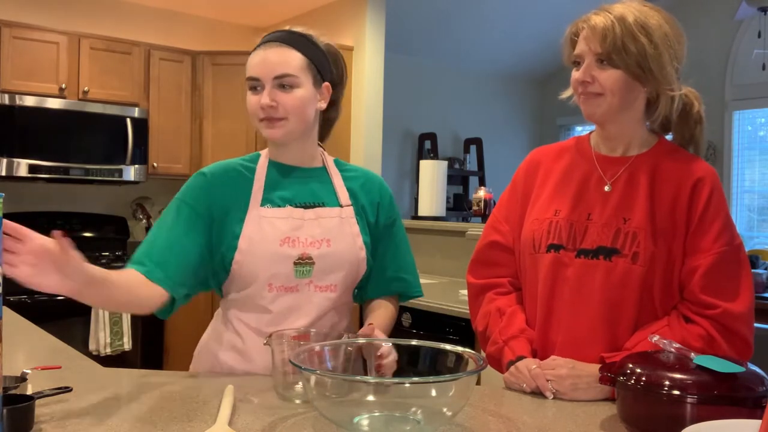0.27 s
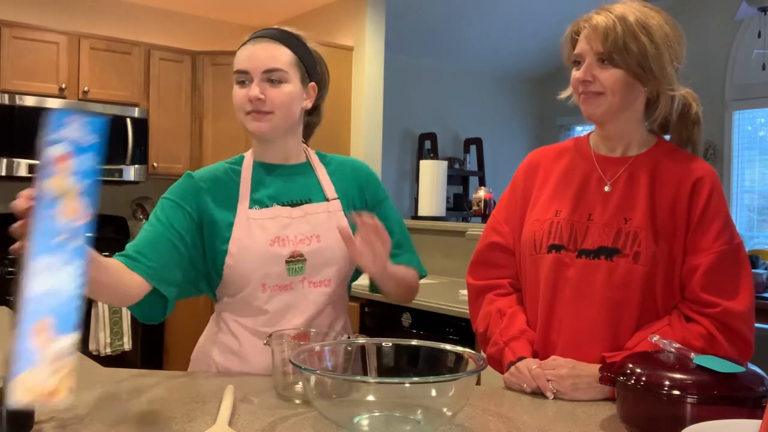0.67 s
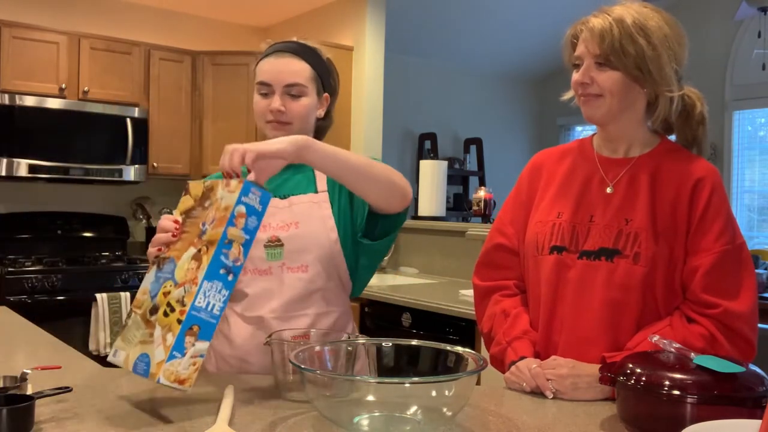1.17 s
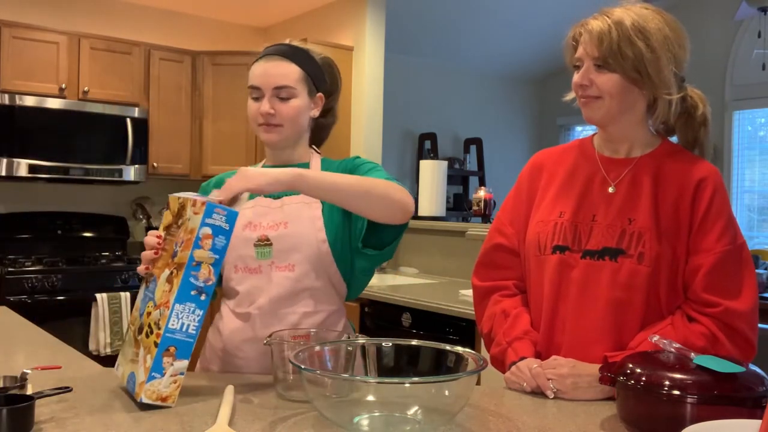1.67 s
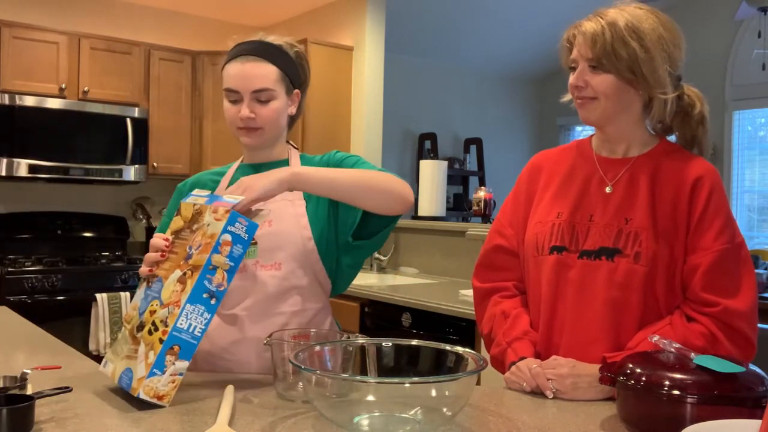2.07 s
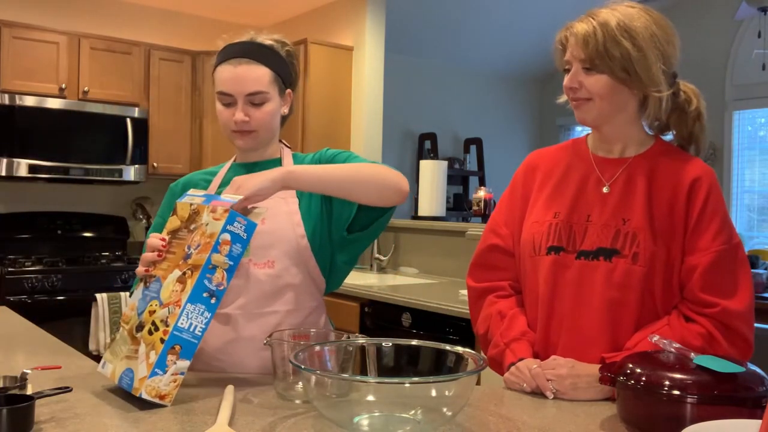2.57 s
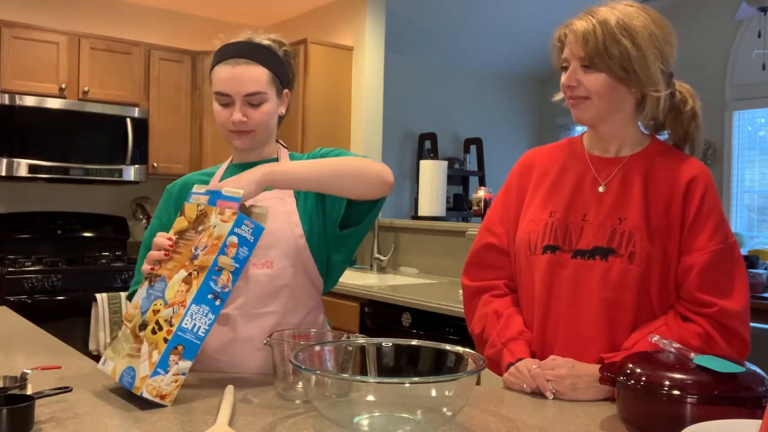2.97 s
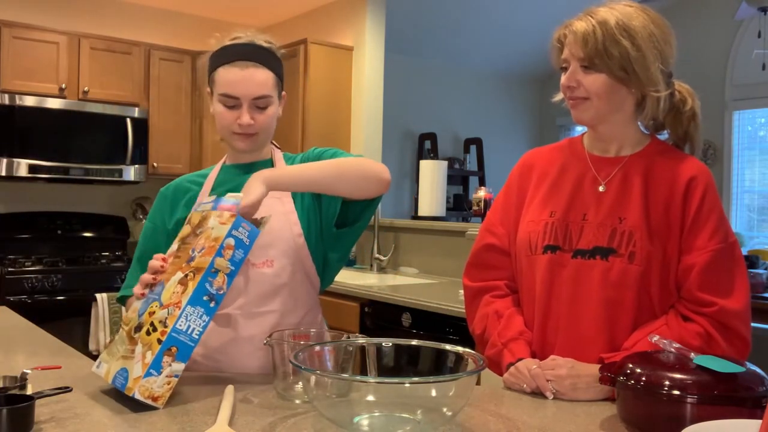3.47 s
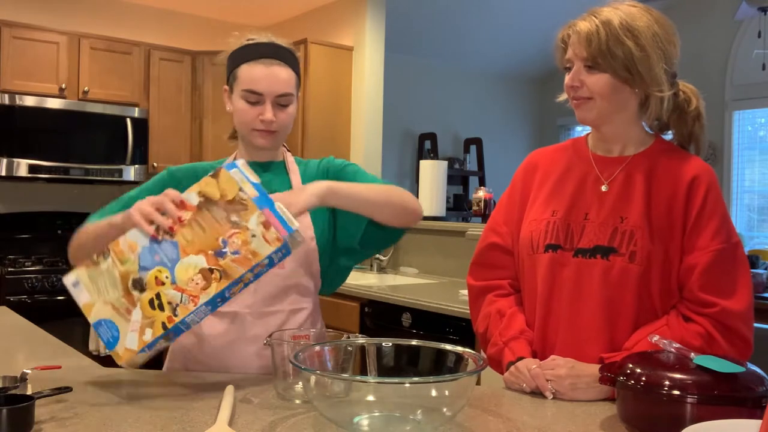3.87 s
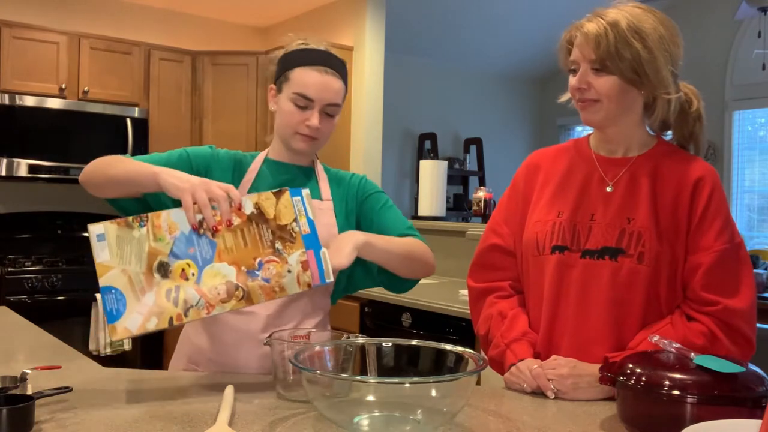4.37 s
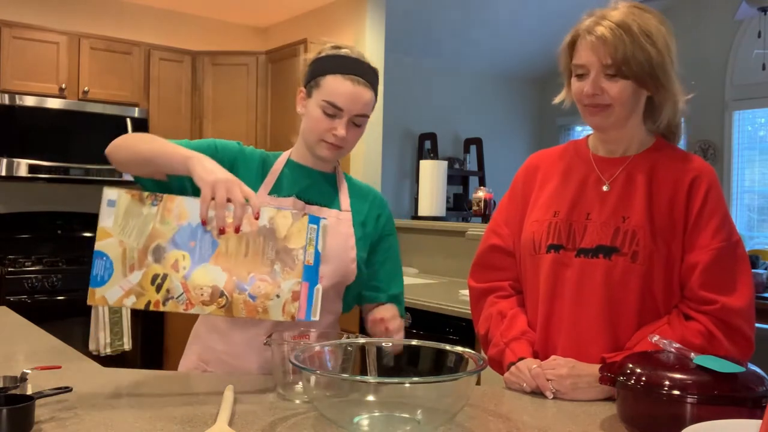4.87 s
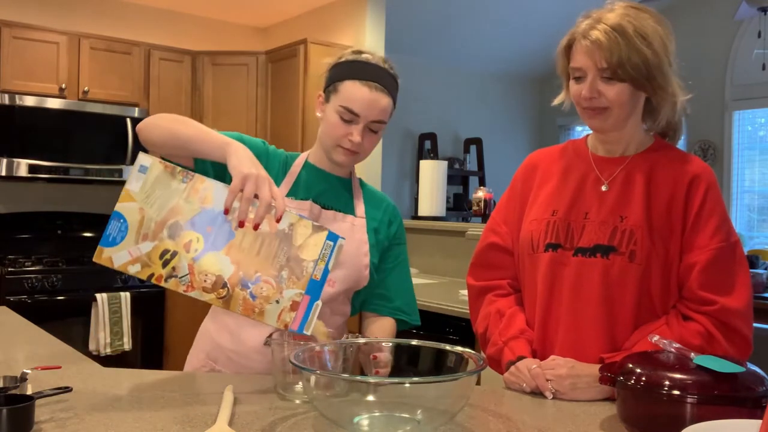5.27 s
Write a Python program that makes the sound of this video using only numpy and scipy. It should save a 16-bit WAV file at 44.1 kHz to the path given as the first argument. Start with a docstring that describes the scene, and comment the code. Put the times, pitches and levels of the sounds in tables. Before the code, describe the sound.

In a kitchen, a hand scrapes and taps a cardboard cereal box, then sets it down with a hollow knock. The inner bag crackles and rustles sharply as it is worked open, with pieces clicking inside. After a brief lull, cereal slides out and starts to patter brightly into glass. A low engine drone and soft room hum lie underneath; close stereo from a metre or two.

```python
"""Cereal box in a kitchen

A hand fetches a cardboard cereal box, knocks it on the counter, crumples the inner bag open and tips
the cereal into a glass cup. Rustle, cracks and drops are grains and noise bursts shaped by filters;
blows ring box modes, pieces ring cup modes. Outside an engine of a few orders drones past over room hum
and air. It is heard in stereo from a metre or two away.
"""
import sys
import numpy as np
from scipy import signal
from scipy.fft import rfft, irfft, next_fast_len
from scipy.io import wavfile
from scipy.ndimage import uniform_filter1d

SR = 44100
rng = np.random.default_rng(int(sys.argv[2]) if len(sys.argv) > 2 else 0)


def transcribe(signal):
    """Save signal, clipped to [-1, 1], as a 16-bit WAV file at the path in sys.argv[1]."""
    frames = np.atleast_2d(signal).T
    limited = np.clip(frames, -1, 1)
    pcm = np.round(limited * 32767).astype(np.int16)
    wavfile.write(sys.argv[1], SR, pcm)


N = 243431

# colour of cereal pieces: f/Hz, relative level per Hz/dB
PIECES_COLOUR = [(900, -34.5), (2000, 1), (2800, 3), (4200, 0), (5500, -0.5), (7000, -3.5), (11000, -10.5),
                 (16000, -36.5)]
# colour of the bag's film: f/Hz, relative level per Hz/dB
FILM_COLOUR = [(3500, -60.5), (6800, 2.5), (10000, 8.5), (12000, 5), (14000, 2), (16500, 10.5)]
# the hand working inside the bag: t/s, rustle level/dB
HAND_RUSTLE = [(2.28, -110), (2.36, -50.5), (2.45, -55), (2.6, -54.5), (2.75, -50.5), (2.96, -51),
               (3.11, -52), (3.25, -39.5), (3.37, -39.5), (3.55, -44.5), (3.68, -45), (3.82, -53.5),
               (3.9, -58), (4.0, -45), (4.17, -45.5), (4.44, -49), (4.6, -63.5), (4.74, -78), (4.9, -110)]


def rustle():
    """Cereal pieces clicking together, the cardboard they shake and the fizz of the bag."""
    # colour of the cardboard: f/Hz, relative level per Hz/dB
    cardboard_colour = [(150, -15.5), (300, 0), (700, 0), (1100, -2.5), (1500, -5), (2000, -9.5),
                        (2600, -10.5), (6000, -51)]
    (level, rumble, fizzing), sliding = handling()
    even = np.sqrt(sliding) * np.array([grains(15000., 0.53, 1.0, 0.024) for _ in range(2)])
    rest = np.sqrt(abs(1 - sliding))
    clicks = even[0] + rest * grains(per_s=4000., spread_db=2.5, clump_db=4.0, clump_s=0.018)
    fizz = even[1] + rest * grains(per_s=9200.0, spread_db=1.0, clump_db=4.5, clump_s=.005)
    scrape = grains(per_s=3000., spread_db=1.4, clump_db=0.5, clump_s=0.0081)
    pieces = coloured(clicks * level, PIECES_COLOUR)
    film = coloured((1.65 * clicks + 1.0 * fizz) * fizzing, FILM_COLOUR)
    board = coloured((0.36 * clicks + 0.5 * scrape) * rumble, cardboard_colour)
    return patchy(pieces + film) + board + clacks(level)


def handling():
    """Sums the powers of all gestures: gains of rustle, rumble and fizz, and the share of even sliding."""
    # separate grips and tugs on box and bag: start t/s, rise/s, length/s, rustle level/dB,
    # rumble drive re rustle/dB, fizz drive re rustle/dB, share of even sliding (0-1)
    grip_rows = [(0, 0.00023, 0.0018, -67.5, 28.5, -26, 1), (0.275, 0.027, 0.087, -61, 20.5, -30, 0.88),
                 (0.303, 0.084, 0.18, -57, 12.5, -35, 0.4), (0.603, 0.072, 0.053, -70, 18.5, -11, 0.9),
                 (0.734, 0.0055, .12, -63, 13, -15, 0.86), (0.892, 0.0077, 0.063, -52.5, 11.5, -22, 0.4),
                 (1.04, 0.025, .13, -57, 12.5, -20, 0.02), (1.245, 0.038, 0.15, -56, 14.5, -19, 0.14),
                 (1.361, 0.004, 0.02, -32, 7, -24, 0.4), (1.445, 0.033, 0.043, -45.5, 11.5, -6, 0.55),
                 (1.518, 0.024, 0.13, -51, 9, -7.5, 1), (1.728, 0.041, 0.037, -40, 11, -6.5, 0.87),
                 (1.845, 0.01, 0.11, -59.5, 16.5, -24, 0.75), (1.947, 0.062, 0.063, -46.5, 6.5, -8, 0.03),
                 (2.125, 0.0067, 0.052, -54, 8, -12, 0.35), (2.272, 0.0076, 0.022, -53, 7, -3, 0),
                 (2.316, 0.0084, 0.008, -44.5, 4.5, 2.5, 0.5), (2.475, .006, 0.025, -52, -4, -0.5, 0),
                 (2.555, 0.0078, 0.037, -47.5, -23, -3.5, 0.74), (2.756, 0.0064, 0.012, -42, -4, -1, 1),
                 (2.809, 0.051, 0.043, -38, 3, 0.5, 0), (2.955, 0.021, 0.13, -41, 3, 0, 0.84),
                 (3.113, 0.018, 0.11, -50, -7, 3.5, 1), (3.817, .016, 0.25, -45, 2, -1.5, 0.97),
                 (4.015, 0.025, 0.077, -41.5, 3, -5, 0.4), (4.342, 0.012, 0.07, -55.5, 15, -8, 0.8),
                 (4.664, 0.0099, 0.0066, -59.5, 10.5, -7, 0.1)]
    # cereal sliding down the tipped box: t/s, rustle level/dB, rumble and fizz drives re rustle/dB
    slide_rows = [(4.6, -110, 26, -13), (4.8, -79, 22, -6), (4.89, -63.5, 9.5, -14), (5.08, -49.5, 8.5, -2),
                  (5.16, -39, 0, -4), (5.24, -44, 5.5, -2), (5.3, -45, 1.5, 12.5), (5.52, -47.5, 5.5, 9.5)]
    rise_from_db, fall_db_per_s = -15.5, 243
    t, power = np.arange(N) / SR, np.zeros((4, N))
    hand_db = by_time(HAND_RUSTLE)[0]
    hand_fizz_db = -4 + 0.43 * (hand_db + 46.5)  # harder crumpling brings out more film fizz
    gestures = [(hand_db, 6, hand_fizz_db, 0.33), (*by_time(slide_rows), 0.88)]
    for s, rise, length, db, *rest in grip_rows:
        end = max(rise, length)
        shape_db = np.interp(t - s, [-1e-4, 0, rise, end, end + .3],
                             [-99, rise_from_db, 0, 0, -.3 * fall_db_per_s], right=-99)
        gestures.append((shape_db + db, *rest))
    for level_db, rumble_db, fizz_db, sliding in gestures:
        sliding, level = np.clip(sliding, 0, 1), gain_of(2 * level_db)
        power += [level, level * sliding, level * gain_of(2 * rumble_db), level * gain_of(2 * fizz_db)]
    return np.sqrt(power[[0, 2, 3]]), power[1] / power[0]


def patchy(x):
    """Patches of time and pitch swell and sink at random, as pieces and folds move."""
    z = signal.stft(x, nperseg=256, noverlap=192)[2]
    patch = smooth_patches(z.shape, frames=24)
    shifted = signal.istft(z * gain_of(2 * patch), nperseg=256, noverlap=192)[1][:N]  # 2 dB rms
    return shifted * np.linalg.norm(x) / np.linalg.norm(shifted)


def clacks(level):
    """A hollow piece rings a few cycles at its own pitch; lesser ones fall at random with the rustle."""
    # larger pieces clacking together: t/s, peak level/dB, f/Hz
    clack_rows = [(2.6394, -48, 2610), (2.7, -42, 2760), (2.7501, -35, 2970), (2.771, -31, 2710),
                  (2.796, -37, 3000), (2.982, -33, 2830), (3.0244, -26, 2240), (3.2714, -30, 2050),
                  (3.3546, -28, 1630), (3.4094, -37, 1870), (3.4814, -35, 1980), (3.6594, -40, 3320),
                  (3.7993, -39, 2420), (3.8494, -40, 2130), (3.901, -35, 2060), (3.9644, -41, 2920),
                  (4.1194, -37, 2540), (4.435, -39, 3070)]
    out, t = np.zeros(N), np.arange(1200) / SR

    def ring(hz):
        """Builds in about a cycle and is 60 dB down after 16."""
        return gain_of(-60 * t * hz / 16) * (1 - np.exp(-t * hz)) * np.sin(2 * np.pi * hz * t)

    rattles = rng.standard_normal((len(clack_rows), len(t))) * gain_of(-60 * t / 0.0083)
    for (s, peak_db, hz), rattle in zip(clack_rows, rattles):
        clack = signal.fftconvolve(rattle, ring(hz))
        add(out, s, gain_of(peak_db) * clack / abs(clack).max())
    lesser_db = -9  # re rustle
    hits = grains(per_s=250., spread_db=1.2, clump_db=1.5, clump_s=.03) * level * gain_of(lesser_db)
    pitches = np.geomspace(2200, 8000, num=9)  # Hz
    piece = rng.integers(0, len(pitches), N)
    for k, hz in enumerate(pitches):
        out += signal.oaconvolve(hits * (piece == k), ring(hz) / np.linalg.norm(ring(hz)))[:N]
    return out


def snaps():
    """Each fold of the bag gives a sharp crack, 60 dB down in 31 ms; lesser folds fall at random."""
    # the sharpest folds: t/s, starting level/dB, lower part of the crack re that level/dB
    sharp_folds = [(0.7448, -56, -5), (0.9125, -67, 5), (0.9354, -66, -2), (0.949, -45, -3),
                   (1.066, -51, -5), (1.1293, -49, -3), (1.3648, -34.5, 0), (1.3687, -27, 3),
                   (1.4871, -35, -18), (1.556, -36, -24), (1.5732, -32.5, -5.5), (1.6553, -45.5, 3),
                   (1.764, -30, -3), (1.7755, -30.5, 3.5), (2.0104, -40, -8), (2.1372, -42.5, -3),
                   (2.2738, -41.5, -6), (2.3074, -48, -11), (2.323, -51, -9), (2.411, -36, -4),
                   (2.427, -39, -7), (2.487, -48, -7), (2.521, -45, -8), (2.5617, -39, -9),
                   (2.5866, -44, -4), (2.671, -43, -2), (2.697, -47, -4), (2.7167, -38, 1),
                   (2.7694, -29, -21), (2.817, -35, -12), (2.8371, -32, -9), (2.88, -35, -29),
                   (2.9733, -29, -26), (3.077, -30, -24), (3.2337, -30, -4), (3.3424, -39, 0),
                   (3.3562, -24.5, -21), (3.4492, -31, -26), (3.529, -29, -3), (3.6578, -33.5, -5),
                   (3.7041, -33.5, -23), (3.8303, -39, -2), (3.8453, -31, -8), (3.8722, -32, -21),
                   (3.985, -32, -4), (4.305, -38, -5), (4.4229, -48, -2), (4.4743, -39, -26),
                   (4.628, -48, -1), (5.1116, -36, -5), (5.2531, -37, -12)]
    small_count, small_db, small_spread_db, small_low_db = 90, 0, 5, -4  # small_db is re rustle
    high, low, t = np.zeros(N), np.zeros(N), np.arange(1500) / SR
    when, size = rng.random((small_count, 2)).T
    first_s, last_s = HAND_RUSTLE[0][0], HAND_RUSTLE[-1][0]
    when = first_s + when * (last_s - first_s)
    level_db = np.interp(when, *np.transpose(HAND_RUSTLE)) + small_db + small_spread_db * (2 * size - 1)
    folds = sharp_folds + [(s, db, small_low_db) for s, db in zip(when, level_db)]
    cracks = rng.standard_normal((len(folds), 1500)) * gain_of(-60 * t / 0.031)
    for (s, start_db, low_db), crack in zip(folds, cracks):
        add(high, s, gain_of(start_db) * crack)
        add(low, s, gain_of(start_db + low_db) * crack)
    return coloured(high, FILM_COLOUR) + coloured(low, PIECES_COLOUR)


def knocks():
    """A short crush of the cardboard rings the box modes that lie near the pitch of the contact."""
    # blows on the box: t/s, peak level/dB, contact f/Hz, spread/octaves (at least .1),
    # crush length/s (held to .001-.05), share of the ring left by the hand (held to .05-.6)
    blow_rows = [(0.285, -39.5, 1720, 0.23, 0.065, 0.13), (.296, -35.5, 1220, 0.19, 0.073, 0.5),
                 (.318, -41.5, 1020, 0.32, .04, 0.3), (.345, -39, 3000, 0.35, .05, 0.2),
                 (.43, -39, 3100, 0.37, 0.056, 0.2), (.5, -46, 3000, .4, .05, .1),
                 (.472, -43, 4100, 0.22, .015, 0.2), (0.292, -34, 276, 0.25, 0.027, 0.6),
                 (0.407, -34.5, 3240, 0.26, 0.018, 0.27), (0.476, -33.5, 3160, 0.24, 0.0085, 0.07),
                 (0.653, -46, 1210, 1.2, 0.0055, 0.3), (0.746, -41, 603, 0.16, 0.033, 0.5),
                 (.745, -46, 4300, .2, .008, 0.2), (0.835, -46.5, 4300, .2, 0.021, 0.5),
                 (.838, -42, 900, 0.82, 0.014, 0.24), (.848, -37.5, 540, 0.17, 0.011, 0.14),
                 (0.9, -36, 1420, 0.39, 0.065, 0.6), (.913, -30.5, 560, 0.19, 0.015, 0.2),
                 (.951, -26, 1260, 0.39, 0.023, 0.43), (0.956, -28, 600, 0.17, 0.019, 0.1),
                 (1.031, -32, 344, 0.8, 0.04, 0.07), (1.104, -29.5, 387, 1.1, 0.025, 0.6),
                 (1.108, -43, 1950, 0.16, 0.044, 0.7), (1.15, -35, 534, 0.7, 0.062, 0.3),
                 (1.163, -28.5, 270, 0.41, 0.015, 0.33), (1.178, -44, 656, 0.49, 0.029, 0.6),
                 (1.233, -49, 800, .5, .015, 0.3), (1.281, -40, 1300, 0.58, 0.032, 0.6),
                 (1.297, -43, 1400, 0.38, .04, 0.4), (1.3652, -24, 1900, 0.4, 0.003, 0.1),
                 (1.369, -19, 5760, 0.22, 0.0012, 0.5), (1.3686, -11, 734, 0.17, 0.0028, 0.4),
                 (1.3688, -17.5, 1520, 0.24, 0.0032, 0.67), (1.371, -18.5, 260, 0.54, 0.015, 0.1),
                 (1.374, -11, 1490, 0.24, 0.01, 0.17), (1.379, -16, 696, 0.93, 0.018, 0.05),
                 (1.387, -18.5, 684, 0.37, 0.024, 0.5), (1.402, -27, 1500, 0.84, 0.019, 0.7),
                 (1.577, -34.5, 506, 1.3, 0.022, 0.3), (1.654, -42, 1500, 0.48, 0.023, 0),
                 (1.73, -44, 700, 0.22, 0.016, 0.4), (1.749, -26.5, 890, 0.33, 0.024, 0.4),
                 (1.757, -21, 442, 0.78, 0.034, 0), (1.763, -19.5, 545, 0.31, 0.034, 0.13),
                 (1.766, -33, 4300, 0.51, .004, .3), (1.776, -29, 3600, 0.65, 0.0027, 0.5),
                 (1.778, -26, 690, 0.16, 0.024, 0.55), (1.765, -20.5, 214, 0.65, 0.043, 0.4),
                 (1.788, -26.5, 270, 0.41, 0.04, 0.17), (1.812, -39, 400, .5, 0.026, 0.5),
                 (1.848, -32, 700, 0.64, 0.057, 0.2), (2.861, -42, 3930, 0.53, 0.0088, 0.5),
                 (2.768, -35, 800, .4, .012, .3), (3.1, -32.5, 273, 0.33, 0.023, 0.3),
                 (3.287, -32, 2050, .2, .006, .3), (3.3066, -18.5, 1370, .1, .004, .4),
                 (3.3075, -26, 2450, .15, .006, .4), (3.311, -27, 650, .3, .006, .3),
                 (3.988, -38, 1130, 0.17, .05, 0.26),           (4.047, -31, 2880, 0.38, 0.014, 0.5)]
    # modes of the undamped box: f/Hz, relative level/dB, t60/s
    box_modes = [(150, -9, .1), (255, -6, .09), (370, -6, .08), (480, -5, .07), (600, -2, .06),
                 (720, 0, .06), (820, -2, .05), (920, -2, .05), (1060, -2, .05), (1200, -3, .04),
                 (1340, -3, .04), (1480, -3, .04), (1690, -3, .035), (2050, -5, .03), (2480, -5, .03),
                 (2950, -5, .025), (3300, -5, .025), (4300, -6, .02), (5300, -7, .015), (6300, -7, .015)]
    out, t = np.zeros(N), np.arange(3000) / SR
    chance = rng.standard_normal((len(blow_rows), 2000 + len(box_modes)))
    hz, db, t60 = np.transpose(box_modes)[:, :, None]
    for (s, peak_db, contact_hz, octaves, crush_s, free), luck in zip(blow_rows, chance):
        near_db = -6 * (np.log2(hz / contact_hz) / max(octaves, .1)) ** 2
        spot = 1 + .02 * luck[2000:, None]  # another spot of the box, slightly other modes
        fade_db = -60 * t / (t60 * np.clip(free, .05, .6))
        ring = np.sum(gain_of(db + near_db + fade_db) * np.sin(2 * np.pi * hz * spot * t), axis=0)
        ring *= 1 - np.exp(-t * contact_hz)  # the contact takes about one cycle to build
        ring = signal.lfilter(*signal.butter(2, 130, "high", fs=SR), ring)  # a small box: no deep bass
        crush = luck[:2000] * gain_of(-60 * t[:2000] / np.clip(crush_s, .001, .05))
        crush *= 1 - 0.68 * np.exp(-t[:2000] / (crush_s / 8))  # the board gives before it resists
        crush[:3] += .8  # the first touch
        blow = signal.fftconvolve(crush, ring)
        add(out, s, gain_of(peak_db) * blow / abs(blow).max())
    return out


def pour():
    """Each piece that lands rings one mode of the cup; low modes ring out until cereal covers its floor."""
    # cereal landing in the cup: t/s, level/dB
    landing = [(5.08, -78), (5.11, -48), (5.16, -45), (5.22, -49.5), (5.26, -40), (5.3, -41.5),
               (5.36, -38.5), (5.43, -35.5), (5.52, -40)]
    # modes of the cup: f/Hz, relative level/dB, t60/s
    glass_modes = [(1316, 3, .015), (1754, 2, 0.028), (2260, 0, 0.0091), (2723, 0.5, 0.05), (3080, 7, .015),
                   (3600, 9, 0.012), (4100, 6, 0.014), (4400, 10.5, 0.029), (6300, 1, 0.041),
                   (7350, 7.5, 0.063), (8300, 8, 0.055), (11400, -2, .012), (11400, 4, .012),
                   (12700, 9, 0.011), (13500, 14, 0.012)]
    empty_db, empty_below_hz, fill_s = 17, 3200, 0.16
    mode_spread = 0.029  # modes shift with where a piece lands and how full the cup is
    start, t, out = round(landing[0][0] * SR), np.arange(2500) / SR, np.zeros(N)
    drops = grains(per_s=6000., spread_db=1.5, clump_db=1.5, clump_s=0.013)
    drops = (drops * gain_of(by_time(landing)[0]))[start:]
    empty = gain_of(empty_db * np.exp(-(np.arange(N - start) / SR / fill_s) ** 4))
    modes = [(hz * (1 + mode_spread * spot), db, t60)
             for hz, db, t60 in glass_modes for spot in rng.standard_normal(3)]
    mode = rng.integers(0, len(modes), N)[start:]
    rings = np.array([gain_of(db - 60 * t / t60) * np.sin(2 * np.pi * hz * t) for hz, db, t60 in modes])
    rings *= np.sqrt(len(modes)) / np.linalg.norm(rings)
    for k, ring in enumerate(rings):
        hits = drops * (mode == k) * (empty if modes[k][0] < empty_below_hz else 1)
        out[start:] += signal.fftconvolve(hits, ring)[:N - start]
    return out


def drone():
    """Low orders of the engine sink in pitch as it passes; steady low tones of the room waver slightly."""
    # passing engine: t/s, then level/dB of its 4th, 5th and 6th order
    order_levels = [(0.1, -52, -45.5, -63), (0.46, -50.5, -43, -63), (0.82, -54, -50, -49),
                    (1.1, -44, -52, -46), (1.36, -53, -42, -73), (1.56, -43, -51, -64),
                    (2.0, -43.5, -59.5, -81), (2.44, -46, -62, -71), (2.62, -46.5, -41, -77),
                    (2.9, -45, -37.5, -44), (3.3, -39, -37.5, -66), (3.55, -44, -33, -70),
                    (3.88, -50, -38.5, -74), (4.08, -44, -38, -49), (4.35, -66, -38.5, -65),
                    (4.62, -68, -47.5, -59), (4.96, -49.5, -38, -62), (5.45, -53, -44, -50)]
    # cycle rate of the engine: t/s, f/Hz
    cycle_rate = [(0, 21.7), (1.6, 21.8), (2.6, 21.05), (5.52, 18.85)]
    # steady low tones of the room: f/Hz, level/dB
    hum_tones = [(56.5, -52), (112, -62), (141, -53)]
    turns, t = np.cumsum(by_time(cycle_rate)[0]) / SR, np.arange(N) / SR

    def tone(db, cycles, wobble):
        """A sine with a random start; wobble is a phase in radians."""
        return gain_of(db) * np.sin(2 * np.pi * (cycles + rng.random()) + wobble)

    engine = [tone(db + 1.8 * drift(0.15), k * turns, 0.04 * drift(0.026))
              for k, db in zip((4, 5, 6), by_time(order_levels))]
    whine = tone(-59 - 4.0 * t, 16 * turns, 0.098 * drift(0.037))  # a thin 16th order, fading 4 dB/s
    hum = [tone(db + 2 * drift(.15), hz * t, .4 * drift(.1)) for hz, db in hum_tones]
    return np.sqrt(2) * (sum(engine) + whine + sum(hum))  # levels are rms


def air():
    """Steady background of the room: shaped noise, unrelated at two points, at -46.5 dB rms."""
    # colour of the room air: f/Hz, relative level per Hz/dB
    air_colour = [(20, -30), (40, 4), (70, 7.5), (110, 9), (170, 2), (340, -8.5), (700, -18), (1500, -37),
                  (3000, -38), (6000, -43), (16000, -43)]
    z = rfft(rng.standard_normal((2, N))) * gain_of(by_hz(air_colour, np.fft.rfftfreq(N, 1 / SR)))
    return gain_of(-46.5) * evened(irfft(z, N))


def kitchen(loose, sharp, wet_db):
    """Direct sound, its widened copy and sparse dying taps in three sets that take turns steadily."""
    # decay of the room: f/Hz, t60/s
    room_decay = [(200, 0.41), (600, 0.27), (1500, 0.41), (4000, 0.53), (9000, 0.13), (15000, 0.21)]
    x, taps = loose + sharp, np.zeros((3, 2, SR // 2))
    # one tap of either sign in every 20 samples
    at = np.arange(100, SR // 2 - 20, 20) + rng.integers(0, 20, (3, 2, (SR // 2 - 101) // 20))
    np.put_along_axis(taps, at, rng.choice([-1., 1.], at.shape), 2)
    hz, t, z = signal.stft(taps, SR, nperseg=256)
    decay = gain_of(-60 * t / by_hz(room_decay, hz)[:, None])
    tail = signal.istft(z * decay, SR, nperseg=256)[1]
    tail /= np.linalg.norm(tail, axis=2, keepdims=True)
    turn = np.pi * (2.3 * np.arange(N) / SR + np.arange(3)[:, None] / 3)
    shares = np.sqrt(2 / 3) * abs(np.cos(turn))  # squares sum to 1
    echoes = signal.fftconvolve((shares * x)[:, None], tail, axes=2).sum(0)[:, :N]
    copy = widened(loose, radians=2.5) + widened(sharp, radians=.7)  # blows and snaps are turned less
    direct = np.array([x, copy])
    return (direct + gain_of(wet_db) * echoes) / np.sqrt(1 + gain_of(2 * wet_db))


def widened(x, radians):
    """A widened copy: each patch of time and pitch turns in phase at random."""
    z = signal.stft(x, nperseg=256, noverlap=192)[2]
    phase = np.pi / 2 + radians * smooth_patches(z.shape, frames=20)
    turned = signal.istft(z * np.exp(1j * phase), nperseg=256, noverlap=192)[1][:N]
    return turned * np.linalg.norm(x) / np.linalg.norm(turned)


def smooth_patches(shape, frames):
    """Smooth chance of rms 1 over pitch and time."""
    over_pitch = uniform_filter1d(rng.standard_normal(shape), size=5, axis=0)
    return evened(uniform_filter1d(over_pitch, size=frames, axis=1))


def grains(per_s, spread_db, clump_db, clump_s):
    """Tiny impacts of either sign, a few large, swelling in clumps; rms 1."""
    size = gain_of(spread_db * np.minimum(rng.exponential(1, N), 5) + clump_db * drift(clump_s))
    return evened(size * rng.standard_normal(N) * (rng.random(N) < per_s / SR))


def drift(seconds):
    """Slow chance of rms 1: noise averaged twice over the given time."""
    size = max(round(seconds * SR), 1)
    return evened(uniform_filter1d(uniform_filter1d(rng.standard_normal(N), size), size))


def coloured(x, spectrum):
    """Causal filter: the phase is minus the Hilbert transform of the log gain."""
    log_gain = np.log(gain_of(by_hz(spectrum, abs(np.fft.fftfreq(4096, 1 / SR)))))
    taps = np.fft.ifft(np.exp(np.conj(signal.hilbert(log_gain)))).real[:1024]
    return signal.oaconvolve(x, taps / np.linalg.norm(taps), axes=-1)[..., :x.shape[-1]]


def gain_of(db):
    """Decibels to gain."""
    return 10 ** (np.asarray(db) / 20)


def evened(x):
    """Scales to rms 1."""
    return x / np.sqrt(np.mean(x ** 2) + 1e-20)


def by_hz(points, hz):
    """Reads the columns of a table on a log-frequency axis."""
    f, *columns = np.transpose(points)
    return np.squeeze([np.interp(np.log(hz + 1), np.log(f + 1), c) for c in columns])


def by_time(rows):
    """Reads the columns of a curve at every sample."""
    s, *columns = np.transpose(rows)
    return [np.interp(np.arange(N) / SR, s, c) for c in columns]


def add(mix, s, sound):
    """Mixes a sound in at s seconds."""
    part = mix[round(s * SR):][:len(sound)]
    part += sound[:len(part)]


def scene():
    """Near sounds in the kitchen over the low background, as two signals for the stereo image."""
    near = kitchen(rustle() + pour(), knocks() + snaps(), wet_db=-3.5)
    return near + np.array([drone(), drone()]) + air()


def record(dry):
    """Sets likeness, phase and balance of right against left by pitch; then the band limit."""
    # stereo image by pitch: f/Hz, left-right likeness (0-1), right lead/rad, left level re right/dB
    stereo_image = [(25, .97, 0, 2), (60, .94, .55, 1.6), (170, .88, .4, .3), (340, .45, -.5, -.5),
                    (700, .45, -1.3, 3.5), (1050, .4, -1.2, 4), (1600, .38, -1.6, 1.5), (2700, .4, -2.3, 1),
                    (4300, .3, -3.1, .3), (6000, .47, -4.8, -.3), (6900, .3, -4.5, 0),
                    (7700, .93, -3.25, 0), (8000, .998, -3.14, 0), (8800, .998, -3.14, 0),
                    (9300, .88, -2.7, 0), (10800, .78, -1.2, .3), (11800, .998, 0, 0), (13000, .998, 0, 0),
                    (13600, .8, .6, 0), (14600, .68, 1.8, .3), (15700, .92, 3.1, 0)]
    edge_hz = 15780
    size = next_fast_len(N + 4096)
    same, lead, balance_db = by_hz(stereo_image, np.fft.rfftfreq(size, 1 / SR))
    same, (first, second) = np.clip(same, 0, 1), rfft(dry, size)
    right = np.exp(1j * lead) * (same * first + np.sqrt(1 - same ** 2) * second)
    half_balance = gain_of(balance_db / 2)
    pair = irfft(np.array([first * half_balance, right / half_balance]), size)[:, :N]
    low_pass = signal.firwin(1023, edge_hz, window=("kaiser", 9), fs=SR)
    return signal.oaconvolve(pair, low_pass[None], "same")


dry = scene()
out = record(dry)
transcribe(out)
```